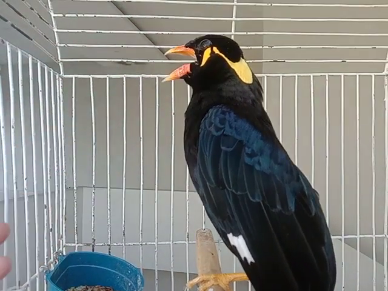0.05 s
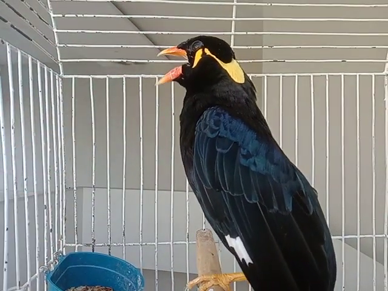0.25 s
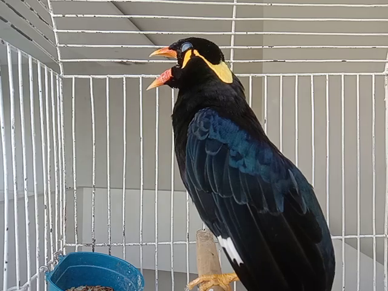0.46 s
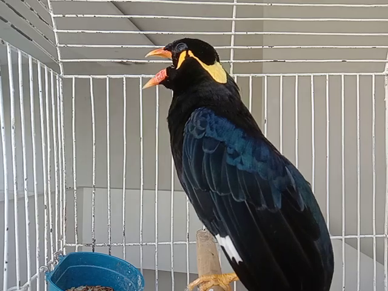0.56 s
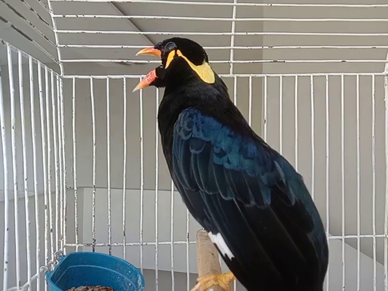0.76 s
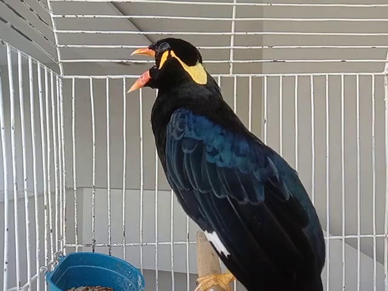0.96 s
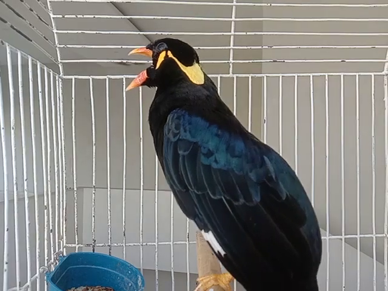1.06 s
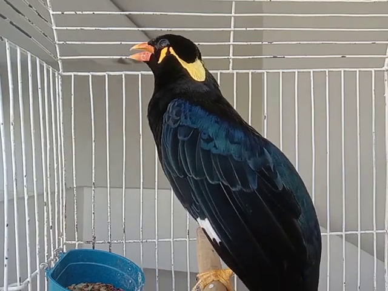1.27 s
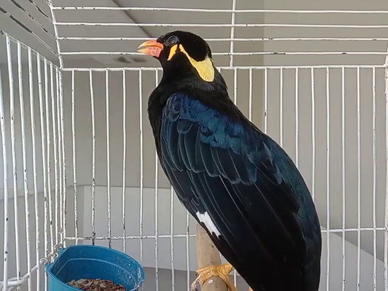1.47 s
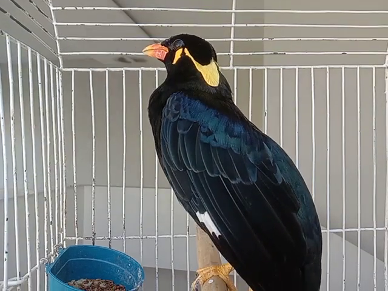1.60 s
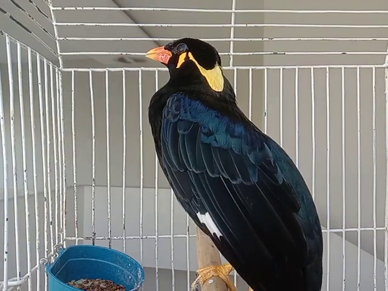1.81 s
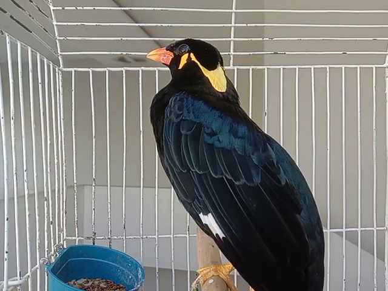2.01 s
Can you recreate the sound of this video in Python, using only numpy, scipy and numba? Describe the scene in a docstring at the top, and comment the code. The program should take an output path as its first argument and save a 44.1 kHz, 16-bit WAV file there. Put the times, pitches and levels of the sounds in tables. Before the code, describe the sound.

First a wire cage is knocked and jingles, then a myna bird gives three piercing two-note whistles, each jumping upward, with beak ticks and low buzzes between them; strong indoor echo fades, captured on a phone.

```python
"""A hard, echoing room, heard through a phone's microphone: a caged myna whistles three pairs of short notes.
Each pair goes low, then high, as near-sine tones; short chirps, beak ticks and low throaty chatter lie between.
Just before the whistles the wire cage is knocked: damped modes ring and grainy noise rattles on.
The gain control ducks on the whistles and holds up their long echo, built from two wall echoes and a noise tail."""
import sys
import numpy as np
from scipy import signal
from scipy.fft import rfft, irfft
from scipy.io import wavfile
from scipy.ndimage import uniform_filter1d, minimum_filter1d
from numba import njit

SR = 44100
rng = np.random.default_rng(int(sys.argv[2]) if len(sys.argv) > 2 else 0)


def wav_out(sig):
    """Save sig, one row per channel (or a flat mono array), as 16-bit PCM at SR to the path in sys.argv[1]."""
    wavfile.write(sys.argv[1], SR, np.round(np.clip(np.atleast_2d(sig).T, -1, 1) * 32767).astype(np.int16))


N = 90404

# Source levels are those ahead of the phone's gain control; noise spectra give shape only.
# room tone, spectrum: (frequency [Hz], density [dB per Hz])
ROOM_TONE_SPECTRUM = [(24, -43.5), (40, -15.5), (80, 0.5), (180, -10.5), (292, -8.5), (633, -16.5),
                      (1150, -13.5), (1260, -3.5), (1400, -27), (1900, -11.5), (3000, -32), (7600, -38),
                      (8000, -61)]
# room tone, mean level: (time [s], level [dB])
ROOM_TONE_LEVEL = [(0., -87), (.35, -101), (.6, -99), (1.2, -81), (1.55, -79.5), (1.7, -83.5),
                   (2.05, -87.5)]
TONE_SWELL_DB, HISS_DB = 2.2, -100  # rms swell of the room tone; steady white hiss

# knocks on the cage: (time [s], level [dB], rattle [dB], jingle [dB])
KNOCKS = [(0., -61, -54, -56), (0.156, -39.5, -50.5, -58.5), (.172, -46, -61.5, -59.5),
          (0.191, -53.5, -69, -54.5)]
# ringing modes of the cage: (frequency [Hz], level [dB], t60 [s])
CAGE_MODES = [(638, -8.5, 0.15), (687, -4.5, 0.082), (1260, 2, .03), (1727, -3, .04), (2490, 10, .025),
              (3020, 5.5, 0.031), (5430, -25.5, .04), (6970, -10, .04)]
# wires already ringing at the start: (frequency [Hz], level [dB], t60 [s])
RINGING_WIRES = [(4225, -61, .5), (5328, -64, .5)]
# wire rattle, its bright jingle and the thin top of a knock: (frequency [Hz], density [dB per Hz])
RATTLE_SPECTRUM = [(120, -56.5), (200, -21.5), (395, -23.5), (642, -2.5), (1000, -0.5), (1100, -8.5),
                   (1270, -1.5), (1910, -11.5), (2400, -1), (2960, -3.5), (3800, -24), (7000, -19.5),
                   (8000, -44.5), (9000, -44), (15500, -50)]
JINGLE_SPECTRUM = [(3900, -25), (4300, -6.5), (4800, 0.5), (5400, 0), (6900, -15), (7600, -25),
                   (8200, -63.5)]
AIR_SPECTRUM = [(7000, -29.5), (8300, -11), (9000, 6), (10000, -30), (11500, -4), (13500, -11.5),
                (15300, 1)]
RATTLE_T60_S, JINGLE_T60_S, AIR_T60_S = 1, 0.71, 0.353
AIR_DB = -36  # relative to the knock
GRAIN_DB, PATCH_DB = 1.5, 3.5  # rms unevenness of the rattle, overall and band by band

# short rising chirps: (time [s], length [s], start [Hz], end [Hz], level [dB], second partial [dB])
CHIRPS = [(.102, 0.013, 3000, 3075, -49, -41.5), (0.487, 0.015, 2190, 2397, -24, -13.5),
          (0.855, 0.019, 2155, 2458, -25.5, -16.5)]
# whistled notes, one curve each, lower and upper voice: (time [s], pitch [Hz], level [dB])
LOW_NOTES = [
    [(0.348, 2694, -53), (0.366, 2511, -28.5), (0.376, 2585, -22.5), (0.396, 2555, -19),
     (0.412, 2474, -33.5)],
    [(0.706, 2608, -28), (0.716, 2670, -38.5), (0.732, 2573, -19), (0.748, 2576, -14.5),
     (0.77, 2403, -14.5), (0.782, 2585, -16.5)],
    [(1.04, 2567, -57.5), (1.046, 2553, -26), (1.058, 2573, -17.5), (1.074, 2630, -12),
     (1.092, 2426, -22.5), (1.1, 2468, -9.5), (1.108, 2562, -29)],
]
HIGH_NOTES = [
    [(.378, 3734, -41), (.39, 3644, -34.5), (.423, 3452, -13), (.435, 3174, -14.5), (.447, 3332, -9.5),
     (.457, 3370, -14), (.468, 3587, -10.5)],
    [(.778, 3680, -66), (.787, 3475, -5.5), (.794, 3322, -15.5), (.802, 3457, -13.5), (.812, 3161, -5.5),
     (.826, 3370, -24), (.836, 3380, -18)],
    [(1.108, 3880, -16), (1.115, 3787, -23), (1.14, 3720, -20), (1.155, 3680, -20.5), (1.17, 3470, -13.5),
     (1.185, 3402, -24.5), (1.2, 3666, -19.5)],
]
# overtones at the reference effort: (multiple of the pitch, level [dB])
LOW_OVERTONES = [(2, -24.5), (3, -35), (4, -49), (5, -54.5), (6, -38.5)]
HIGH_OVERTONES = [(2, -32.5), (3, -55)]
# level flutter of each upper note: (rms share)
HIGH_FLUTTER = [.05, .1, 0.42]
# direct sound of each upper note as the head turns away: (gain [dB])
FACING_DB = [-0.7, 1.5, -7.5]
# air noise around the whistle: (frequency [Hz], density [dB per Hz])
WHISTLE_BREATH_SPECTRUM = [(3000, -25.5), (4200, -3), (6000, -5), (7500, -1.5), (8000, -38), (15500, -35)]
WHISTLE_BREATH_DB = -42  # relative to the envelope of the direct whistle
OVERTONE_REF_DB = -13.5  # reference effort
OVERTONE_GROWTH = 0.53  # dB of overtone share per dB of effort
# the beak points away, so overtones come more by the walls: gain and cutoff of the lower voice's direct ones
OVERTONE_DIRECT_DB, OVERTONE_DULL_HZ = 0.5, 6500

# reverberation time of the room: (frequency [Hz], t60 [s])
ROOM_T60 = [(1000, 0.97), (2500, 2.03), (3500, 1.76), (7000, 1.237), (15000, 0.38)]
# near walls: (delay [s], level [dB])
ECHOES = [(0.012, -6), (.021, -13)]
ROOM_DB, ROOM_BUILD_S, ROOM_GAP_S = -7.5, 0.01, 0.0039  # tail level, build-up, wait before it
ROOM_TREBLE_DB = 7  # brightening of the tail at TOP_HZ

# beak ticks: (time [s], level [dB])
TICKS = [(.471, -40), (.49, -32.5), (.739, -66), (.833, -30.5), (1.081, -46), (1.165, -45), (1.189, -48.5),
         (1.197, -53.5)]
# beak ticks before the band filter: (frequency [Hz], density [dB per Hz])
TICK_SPECTRUM = [(1000, -25), (1700, 6), (5000, 9), (7500, -8), (8000, -54.5)]
TICK_T60_S, TICK_WET_DB = 0.02, 5.5  # decay; send to the room

# low chatter: (time [s], length [s], pitch [Hz], level [dB], breath relative to voice [dB])
CHATTER = [(0.499, 0.029, 504, -44, -6), (0.543, 0.033, 494, -48.5, -6.5), (0.589, 0.018, 464, -49.5, -3),
           (0.621, 0.047, 470, -54.5, -0.5), (0.667, 0.03, 469.5, -55.5, 11.5),
           (0.707, 0.018, 452, -58.5, 3), (0.863, 0.041, 475.2, -45, -0.5), (0.908, 0.024, 454, -51, 1.5),
           (0.962, 0.0092, 442.5, -54, 9), (0.986, 0.019, 438, -55, 7), (1.022, 0.0093, 429, -53.5, 10),
           (1.157, 0.018, 466, -88.5, 1.5), (1.177, 0.018, 443, -56, 7.5)]
# throat resonances, each broadened in use: (frequency [Hz], nominal width [Hz], level [dB])
THROAT = [(526, 27, -21.5), (954, 200, 0), (1280, 210, 0), (1513, 360, -3), (2050, 300, -6.5)]
# hiss on top of the chatter: (frequency [Hz], density [dB per Hz])
CHATTER_HISS_SPECTRUM = [(3000, -24.5), (4300, 0), (5800, -7.5), (7400, -19.5), (7900, -49)]
CHATTER_HISS_DB, CHATTER_WET_DB = -3.5, -10  # hiss relative to chatter; send of the buzz to the room
CHATTER_JITTER = .02  # rms share of the pitch

# the phone
AGC_TOP_DB, AGC_RATIO, AGC_MAX_DB = -4, 2.524, 21.5  # level of unity gain, compression ratio, most gain
AGC_ATTACK_S, AGC_RELEASE_S = 0.0037, 0.074
LIMIT_DB, SQUARE, TOP_HZ = -4, 0.0089, 15700  # ceiling, square-law share of the microphone, top cut


def undb(db):
    """Decibels to amplitude."""
    return 10 ** (np.asarray(db) / 20)


def unit(x):
    """Scale to rms 1."""
    return x / np.sqrt(np.mean(x ** 2))


def smooth_noise(size, passes=1):
    """Slow random curve of rms 1: white noise averaged over size samples, once or more."""
    x = rng.standard_normal(N)
    for _ in range(passes):
        x = uniform_filter1d(x, size=size)
    return unit(x)


def noise(spectrum):
    """Noise of rms 1, shaped by a spectrum of (frequency [Hz], density [dB per Hz]) points."""
    hz, db = np.array(spectrum, float).T
    f = np.maximum(np.arange(N // 2 + 1) * SR / N, 1)
    shape = undb(np.interp(np.log(f), np.log(hz), db))
    return unit(irfft(rfft(rng.standard_normal(N)) * shape, N))


def band(x, hz, width):
    """One resonance."""
    return signal.lfilter(*signal.iirpeak(hz, hz / width, SR), x)


def decay(t, t60):
    """Zero before t = 0, then falling 60 dB in t60."""
    return (t >= 0) * np.exp(-np.log(1000) * np.maximum(t, 0) / t60)


def room_tone(t):
    """Shaped noise whose level drifts and swells slowly, over a faint white hiss."""
    level_db = np.interp(t, *np.array(ROOM_TONE_LEVEL).T) + TONE_SWELL_DB * smooth_noise(2000, 2)
    return undb(level_db) * noise(ROOM_TONE_SPECTRUM) + undb(HISS_DB) * rng.standard_normal(N)


def patchy(x):
    """Narrow bands swell and fade on their own, as loose wires take turns."""
    z = signal.stft(x, SR, nperseg=512)[2]
    walk = uniform_filter1d(rng.standard_normal(z.shape), size=2, axis=0)  # across frequency
    walk = uniform_filter1d(walk, size=8, axis=1)  # across time
    return unit(signal.istft(z * undb(PATCH_DB * unit(walk)), SR, nperseg=512)[1][:N])


def wire_noise(spectrum, power):
    """Loose wires chatter in uneven grains under a decaying power curve."""
    grain = undb(GRAIN_DB * smooth_noise(250))
    return np.sqrt(power) * grain * patchy(noise(spectrum))


def cage(t):
    """Each knock rings the cage's damped modes; the wires rattle on after it."""
    ring, air, rattle, jingle = np.zeros((4, N))
    for s, db, rattle_db, jingle_db in KNOCKS:
        since = t - s
        soft = np.clip(since / 0.0042, 0, 1)  # gentle onset
        modes = sum(undb(d) * np.sin(2 * np.pi * f * since) * decay(since, t60) for f, d, t60 in CAGE_MODES)
        ring += undb(db) * soft * modes
        air += undb(db + AIR_DB) * decay(since, AIR_T60_S)
        # the noises of separate knocks add as power
        rattle += (undb(rattle_db) * decay(since, RATTLE_T60_S)) ** 2
        jingle += (undb(jingle_db) * decay(since, JINGLE_T60_S)) ** 2
    wires = sum(undb(d) * np.sin(2 * np.pi * f * t) * decay(t, t60) for f, d, t60 in RINGING_WIRES)
    loose = wire_noise(RATTLE_SPECTRUM, rattle) + wire_noise(JINGLE_SPECTRUM, jingle)
    return ring + air * noise(AIR_SPECTRUM) + wires + loose


def whistle(t, note, overtones, flutter_share=0.):
    """A near sine along a pitch and level curve; returns the fundamental and the overtones."""
    s, hz, db = np.array(note, float).T
    phase = 2 * np.pi * np.cumsum(uniform_filter1d(np.interp(t, s, hz), size=130)) / SR
    edge = np.sin(np.clip(np.minimum(t - s[0], s[-1] - t) / .004, 0, 1) * np.pi / 2) ** 2
    flutter = 1 + flutter_share * smooth_noise(150, 2)
    level = uniform_filter1d(undb(np.interp(t, s, db)), size=130) * edge * flutter
    effort = (np.abs(level) / undb(OVERTONE_REF_DB)) ** OVERTONE_GROWTH
    top = sum(undb(d) * np.sin(round(k) * phase) for k, d in overtones)
    return np.sqrt(2) * level * np.array([np.sin(phase), effort * top])


def chirp(t, s, length, start_hz, end_hz, db, partial_db):
    """A short rising whistle with one overtone."""
    # undo the effort scaling, so that partial_db holds at the chirp's own level
    overtone_db = partial_db + OVERTONE_GROWTH * (OVERTONE_REF_DB - db)
    return whistle(t, [(s, start_hz, db), (s + length, end_hz, db)], [(2, overtone_db)]).sum(axis=0)


def song(t):
    """Both voices of the syrinx: direct sound to the microphone and sound sent to the walls."""
    chirps = sum(chirp(t, *c) for c in CHIRPS)
    low = sum(whistle(t, n, LOW_OVERTONES) for n in LOW_NOTES)
    high = [whistle(t, n, HIGH_OVERTONES, r) for n, r in zip(HIGH_NOTES, HIGH_FLUTTER)]
    dull = signal.sosfilt(signal.butter(2, OVERTONE_DULL_HZ, fs=SR, output="sos"), low[1])
    direct_low = low[0] + undb(OVERTONE_DIRECT_DB) * dull
    direct_high = sum(undb(db) * h[0] for h, db in zip(high, FACING_DB))  # fundamentals only
    direct = direct_low + chirps + direct_high
    envelope = np.abs(signal.hilbert(direct))
    breath = undb(WHISTLE_BREATH_DB) * envelope * noise(WHISTLE_BREATH_SPECTRUM)
    sent = (low + sum(high)).sum(axis=0) + chirps + breath
    return direct + breath, sent


def room(x, t):
    """Two near echoes and a dense noise tail that builds up, then dies sooner in the high treble."""
    hz, t60 = np.array(ROOM_T60).T
    f, s, z = signal.stft(rng.standard_normal(N), SR, nperseg=256)
    fall = np.exp(-np.log(1000) * s / np.interp(f, hz, t60)[:, None])
    bright = undb(ROOM_TREBLE_DB * (f / TOP_HZ) ** 2)[:, None]
    late = np.maximum(t - ROOM_GAP_S, 0)
    tail = signal.istft(z * fall * bright, SR, nperseg=256)[1][:N] * (1 - np.exp(-late / ROOM_BUILD_S))
    tail = tail / np.sqrt(np.sum(tail ** 2))  # unit energy
    near = sum(undb(db) * np.interp(t - lag, t, x, left=0) for lag, db in ECHOES)
    return near + undb(ROOM_DB) * signal.fftconvolve(x, tail)[:N]


def ticks(t):
    """Tiny snaps of the beak: band-limited noise that dies at once."""
    snaps = noise(TICK_SPECTRUM) * sum(undb(db) * decay(t - s, TICK_T60_S) for s, db in TICKS)
    return signal.sosfilt(signal.butter(6, [1300, 7400], "band", fs=SR, output="sos"), snaps)


def throat(x):
    """Parallel resonances, each filtered twice, brought to rms 1."""
    return unit(sum(undb(d) * band(band(x, f, 1.2 * w), f, 1.2 * w) for f, w, d in THROAT))


def chatter(t):
    """Short buzzes of five harmonics mixed with breath through the throat; returns buzz and hiss."""
    s, length, hz, db, breath_db = np.array(CHATTER).T
    jitter = 1 + CHATTER_JITTER * smooth_noise(400)
    phase = 2 * np.pi * np.cumsum(np.interp(t, s, hz) * jitter) / SR
    voiced = throat(sum(np.cos(k * phase) for k in range(1, 6)))
    breath = undb(np.interp(t, s + length / 2, breath_db))
    voice = (voiced + breath * throat(rng.standard_normal(N))) / np.hypot(1, breath)  # even power
    gate = sum(undb(d) * np.clip(np.minimum(t - a, a + n - t) / .003, 0, 1)
               for a, n, d in zip(s, length, db))
    return voice * gate, undb(CHATTER_HISS_DB) * noise(CHATTER_HISS_SPECTRUM) * gate


def scene():
    """Bird, cage and room tone at the microphone; the bird's sounds also go by the walls."""
    t = np.arange(N) / SR
    tone, knocks = room_tone(t), cage(t)
    direct, sent = song(t)
    snaps = ticks(t)
    buzz, hiss = chatter(t)
    wet = room(sent + undb(CHATTER_WET_DB) * buzz + hiss + undb(TICK_WET_DB) * snaps, t)
    return (direct + buzz + hiss + snaps + wet + knocks + tone)[None]


@njit
def follow(x, attack, release):
    """Level that rises fast and falls slowly."""
    e, out = 0., np.empty(len(x))
    for i in range(len(x)):
        e += (x[i] - e) * (attack if x[i] > e else release)
        out[i] = e
    return out


def record(dry):
    """The phone: gain control lifts the quiet, a limiter holds peaks, the microphone bends, the top is cut."""
    size = np.abs(signal.hilbert(dry[0])) + 1e-9
    level = follow(size, 1 / (AGC_ATTACK_S * SR), 1 / (AGC_RELEASE_S * SR)) + 1e-9
    gain = np.clip((undb(AGC_TOP_DB) / level) ** (1 - 1 / AGC_RATIO), 0, undb(AGC_MAX_DB))
    hold = minimum_filter1d(np.minimum(undb(LIMIT_DB) / (size * gain), 1), size=200)
    x = dry * gain * uniform_filter1d(uniform_filter1d(hold, size=100), size=100)
    # square-law bend, without its slow offset
    x = x + SQUARE * signal.sosfilt(signal.butter(4, 120, "high", fs=SR, output="sos"), x ** 2)
    return signal.sosfilt(signal.ellip(10, .2, 70, TOP_HZ, fs=SR, output="sos"), x)


dry = scene()
out = record(dry)
wav_out(out)
```